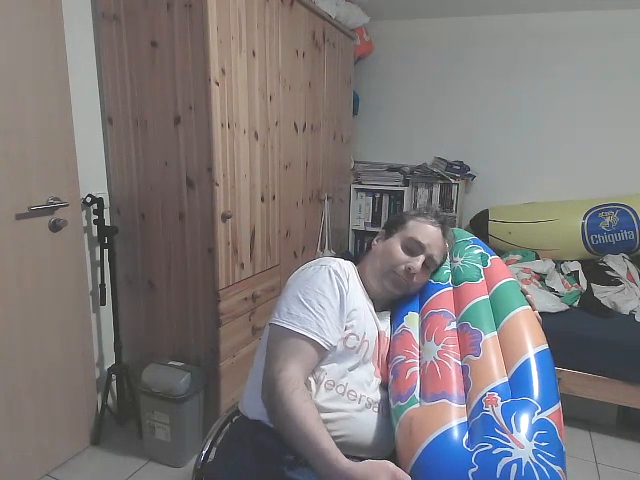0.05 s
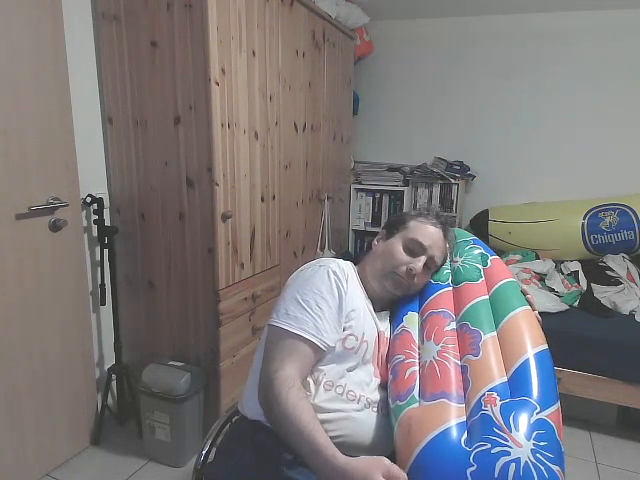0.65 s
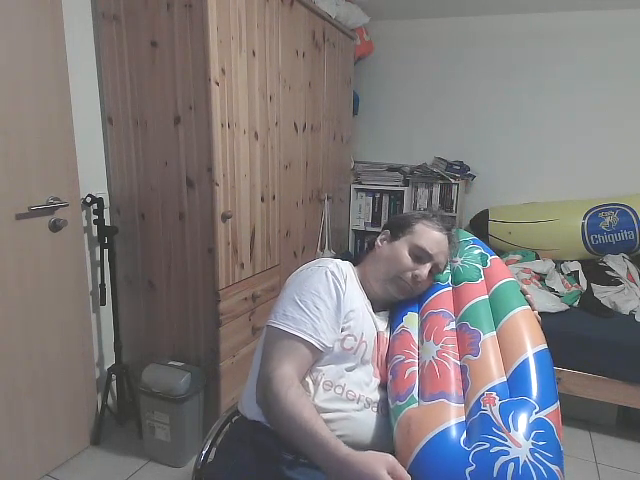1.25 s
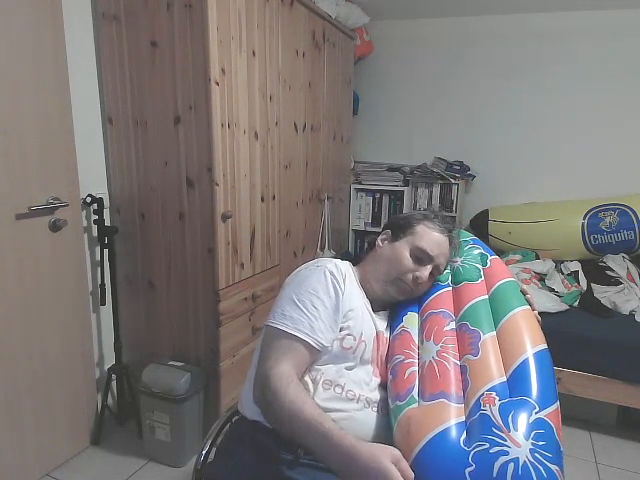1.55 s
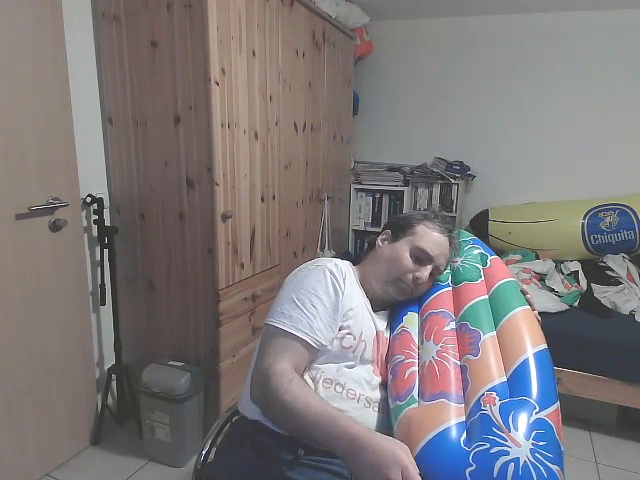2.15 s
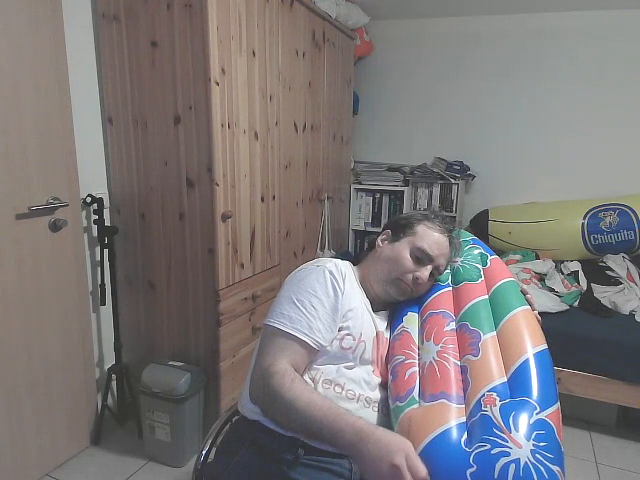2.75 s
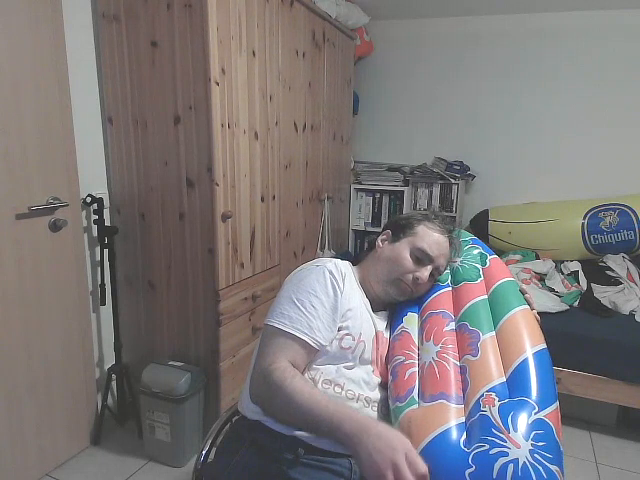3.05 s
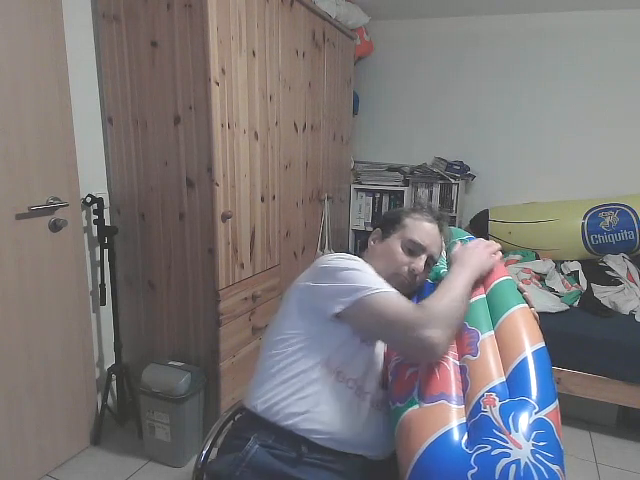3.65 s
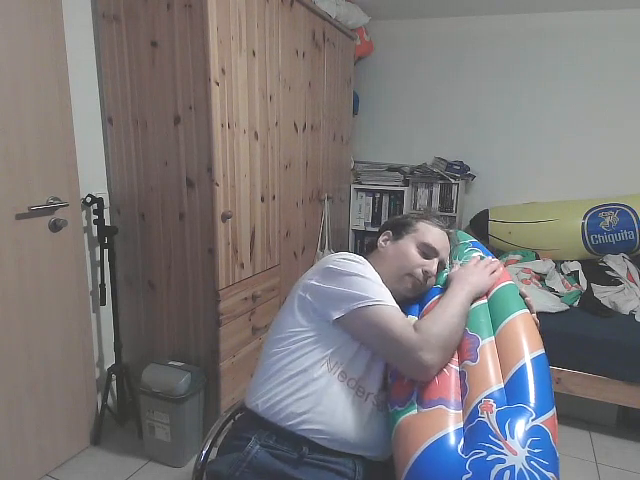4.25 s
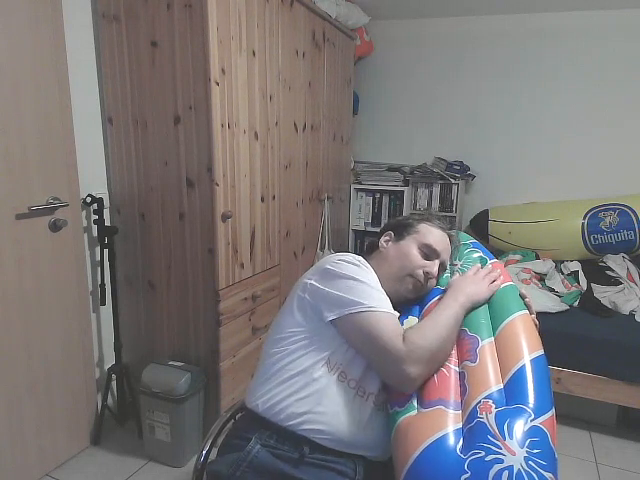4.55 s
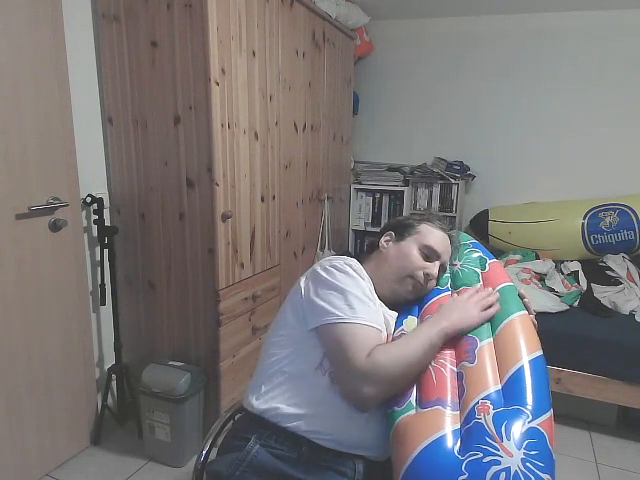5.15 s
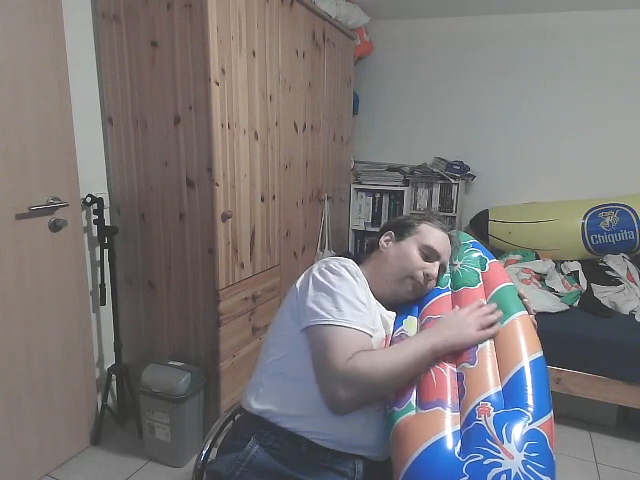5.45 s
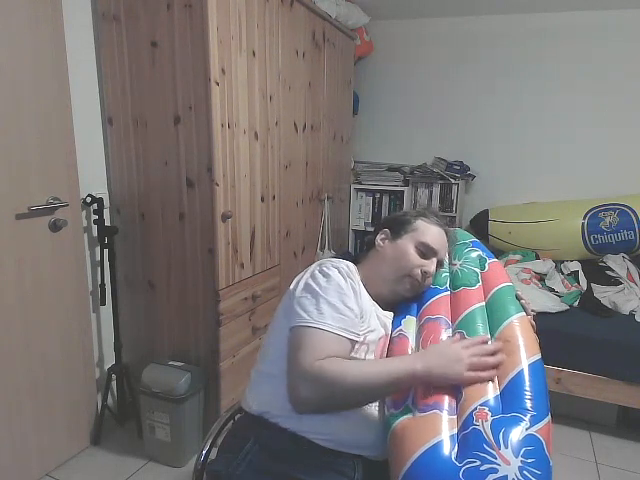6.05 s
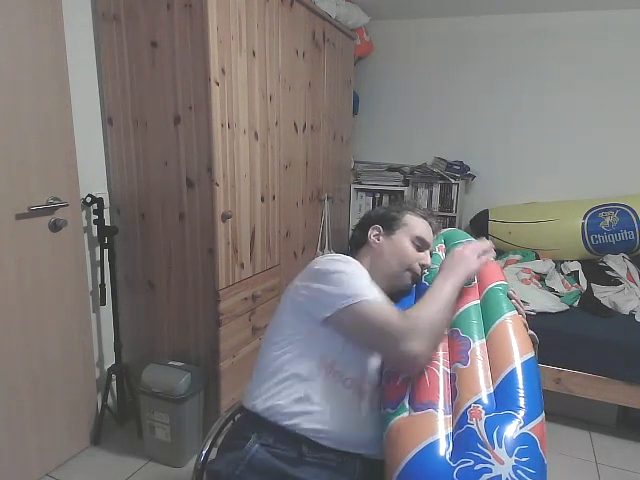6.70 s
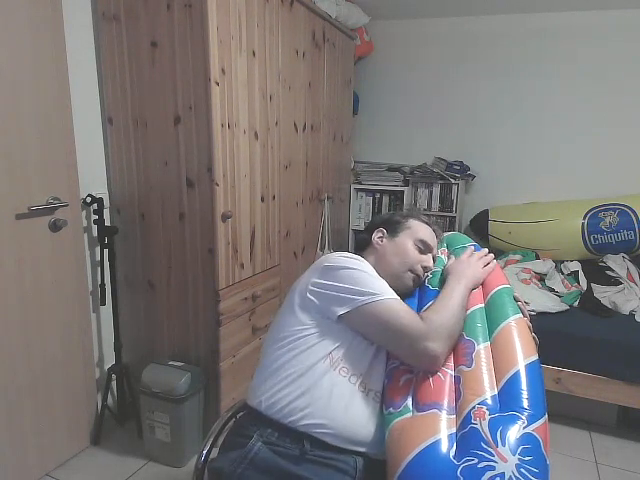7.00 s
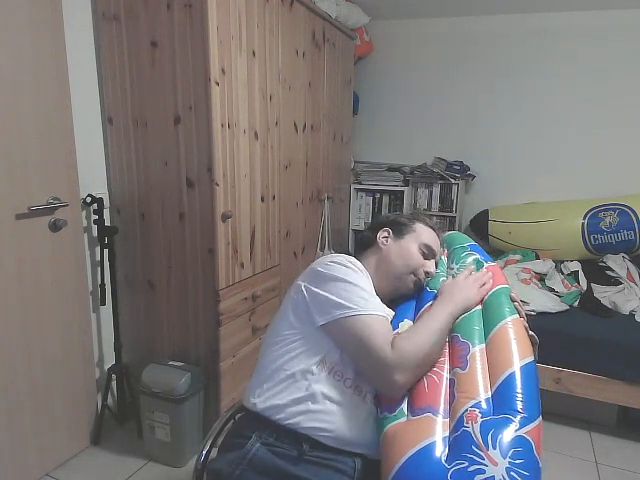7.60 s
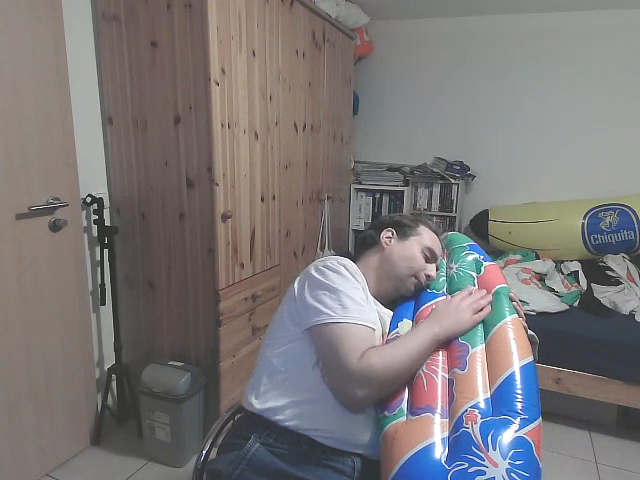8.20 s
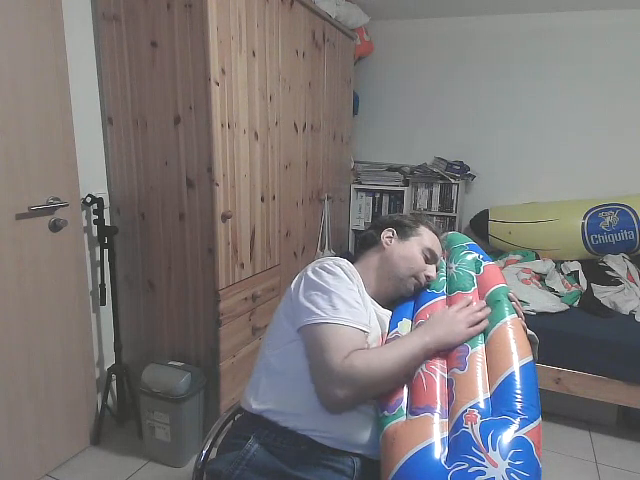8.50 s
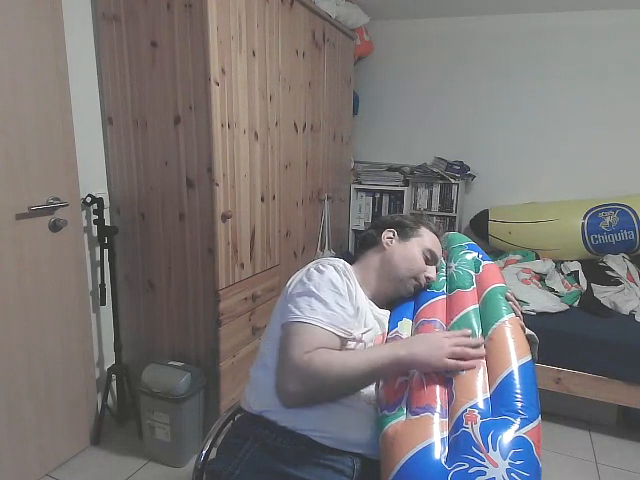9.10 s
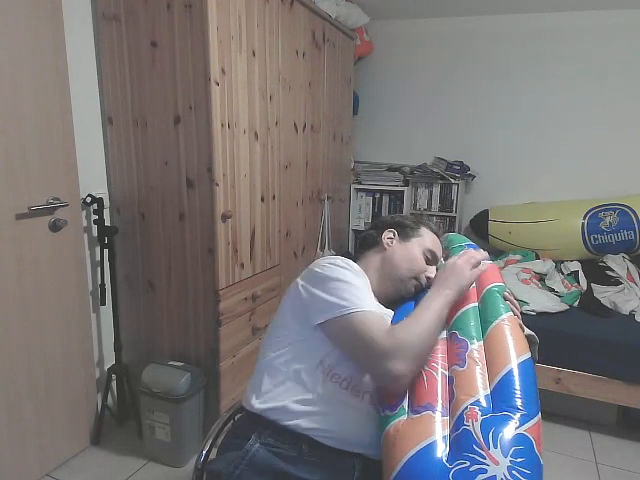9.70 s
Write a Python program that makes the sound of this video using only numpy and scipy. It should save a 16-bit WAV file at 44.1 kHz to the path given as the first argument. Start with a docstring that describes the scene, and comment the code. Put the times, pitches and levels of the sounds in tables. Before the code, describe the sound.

A low rumble, a thin whine and a faint knock are heard in a small quiet bedroom. Then the plug of an inflatable board pops with a thump, and air shrieks out with a brief rasp. The hiss softens, swells as the board is squeezed, and twice nearly stops before returning. Light knocks on the vinyl come in between, with a last low one near the end. One microphone picks it up with a short room echo.

```python
"""The valve of an inflatable board is pinched open in a small quiet bedroom, heard by one microphone.
First come a low rumble, a thin whine and a faint knock. Two seconds in, the plug pops and the board thumps.
The jet of air shrieks for an instant, the flap rasps, and the hiss softens as the pressure falls.
An arm squeezes out more air. Twice the flow nearly stops while the arm shifts its grip,
and returns with the next squeeze. Near the end, a last knock rocks the board."""
import sys
import numpy as np
from scipy import signal
from scipy.fft import rfft, irfft
from scipy.io import wavfile

SR = 44100
rng = np.random.default_rng(int(sys.argv[2]) if len(sys.argv) > 2 else 0)


def bounce(signal):
    """Save signal as a 16-bit WAV file at the path given by the first command-line argument."""
    frames = np.transpose(np.atleast_2d(signal))
    limited = np.clip(frames, -1, 1)
    pcm = np.round(limited * 32767).astype(np.int16)
    wavfile.write(sys.argv[1], SR, pcm)


N = 438354
T = np.arange(N) / SR
FREQS = np.fft.rfftfreq(N, 1 / SR)
OPEN_S = 2.104  # the air starts to escape


def undb(db):
    """Turn decibels into a gain."""
    return 10 ** (np.asarray(db) / 20)


def unit(x):
    """Scale a sound to an average (rms) level of 1."""
    return x / np.sqrt(np.mean(x ** 2))


def curve(table):
    """Join rows of (seconds, value) with straight lines."""
    return np.interp(T, *np.transpose(table))


def colour(points):
    """Gain at every frequency, from rows of (Hz, dB)."""
    hz, db = np.transpose(points)
    return undb(np.interp(np.log(FREQS + 1), np.log(hz), db))


def resonance(hz, width_hz):
    """Gain of one resonance: 1 at its centre, less on either side."""
    return 1j * FREQS * width_hz / (hz ** 2 - FREQS ** 2 + 1j * FREQS * width_hz)


def noise(response):
    """Noise of level 1, shaped by a gain for each frequency."""
    return unit(irfft(rfft(rng.standard_normal(N)) * response, N))


def flicker(db, rate):
    """A gain that wanders by about db decibels, about rate times a second."""
    return undb(db * noise(np.exp(-(FREQS / rate) ** 2)))


def since(start):
    """Seconds since the start, zero before it."""
    return np.maximum(T - start, 0)


def fade(t, t60):
    """A gain that falls 60 dB every t60 seconds."""
    return np.exp(-np.log(1000) * t / t60)


# Tone of the room and microphone noise. Each row: frequency in Hz, relative level in dB.
QUIET_COLOUR = [(10, -21.5), (20, 4.5), (30, -7), (39, -3.5), (52, -14.5), (110, -12.5), (145, -21),
                (200, -20), (285, -19), (400, -29), (550, -28.5), (950, -32), (2000, -36), (7000, -38.5),
                (11000, -37), (12500, -32), (15800, -34)]

def background(whine_hz=15045, ramps_per_s=20, tone_share=.55):
    """Low room rumble, microphone hiss and a thin electrical whine that swells in quick ramps."""
    tone = np.sqrt(2) * np.sin(2 * np.pi * whine_hz * T)
    ramp = (T * ramps_per_s + .26) % 1
    rough_tone = tone_share * tone + (1 - tone_share) * noise(resonance(whine_hz, 220))
    whine = unit((.2 + ramp) * rough_tone)
    fizz = unit(ramp ** 8 * noise(resonance(13600, 2600) ** 2))  # at the end of each ramp
    return undb(-61.5) * noise(colour(QUIET_COLOUR)) + undb(-77) * whine + undb(-79) * fizz


# Notes of the air inside the board. Each row: pitch in Hz, seconds to fade 60 dB, relative level in dB.
CHAMBER_NOTES = [(75, 0.18, 0.5), (110, .12, -2.5), (175, 0.031, 9.5), (259, 0.06, 6), (360, 0.21, -6),
                 (422, .08, -1.5)]
# Knocks on the board. Each row: start in seconds, then levels in dB of the ring, the rocking and the tick.
BOARD_KNOCKS = [(0.112, -69, -84, -63.5), (2.103, -44, -36, -52), (2.441, -57, -79, -62),
                (3.169, -64, -46, -75), (6.886, -68, -80, -55), (8.098, -62, -80, -58),
                (8.773, -62.5, -73, -71), (9.479, -61.5, -40.5, -60)]

def knocks(rock_hz=29, contact_s=0.0015):
    """The popping plug and the shifting arm ring the air chamber, rock the board and tick on its skin."""
    t = np.arange(SR // 2) / SR
    ring = sum(undb(db) * np.sin(2 * np.pi * hz * t) * fade(t, t60) for hz, t60, db in CHAMBER_NOTES)
    rock = np.sin(2 * np.pi * rock_hz * t) * fade(t, t60=0.254)
    skin = noise(resonance(520, 1000) ** 2)
    attack = np.minimum(t / contact_s, 1)  # soft vinyl: a knock takes a moment to build
    out = np.zeros(N + len(t))
    for start, ring_db, rock_db, tick_db in BOARD_KNOCKS:
        i = int(start * SR)
        tick = np.roll(skin, -i)[:len(t)] * fade(t, t60=0.07)
        knock = undb(ring_db) * ring + undb(rock_db) * rock + undb(tick_db) * tick
        out[i:i + len(t)] += knock * attack
    return out[:N]


def opening(rise_s):
    """The flap swings open: 0 when shut, 1 when open."""
    return np.clip(since(OPEN_S) / rise_s, 0, 1)


def choke(at_s=2.39, half_s=0.055, depth_db=-2):
    """A brief dip in the highest hiss as the flap falls back."""
    return undb(depth_db * np.exp(-((T - at_s) / half_s) ** 2))


def shriek(hold_s=0.011):
    """At full pressure the gap whistles and spits; a broad sizzle lingers."""
    whistle = undb(-15) * noise(resonance(9450, 1500) ** 2) * fade(since(OPEN_S + hold_s), t60=0.14)
    spit = undb(-36) * noise(resonance(7000, 2400) ** 2) * fade(since(OPEN_S), t60=1.0)
    sizzle = undb(-37) * noise(resonance(9500, 3400) ** 2) * fade(since(OPEN_S), t60=3.2)
    return (whistle + spit + sizzle) * choke() * opening(rise_s=0.017) ** 2


# The arm squeezes the board. Each row: start, swell time and hold time in seconds, flow level in dB.
ARM_SQUEEZES = [(2.494, 1.16, 1.93, -54), (6.033, .67, .18, -59.5), (6.418, 0.8, 0.38, -60.5),
                (6.997, 0.96, .6, -62.6), (9.165, 0.63, .3, -63.5)]

def outflow(leak_db=-91, blowoff_db_per_s=13.5, sag_db_per_s=5, release_db_per_s=62):
    """Airflow in dB: the board's own pressure blows off, then squeezes push out more, over a tiny leak."""
    blowoff = undb(-40.5 - blowoff_db_per_s * since(OPEN_S))
    power = blowoff ** 2 + undb(leak_db) ** 2
    for start, swell_s, hold_s, db in ARM_SQUEEZES:
        swell = np.minimum(since(start) / swell_s, 1) ** 1.12
        sag_db = sag_db_per_s * since(start + swell_s)  # the board gives way
        release_db = release_db_per_s * since(start + swell_s + hold_s)  # the arm lets go
        power += (swell * undb(db - sag_db - release_db)) ** 2
    return 10 * np.log10(power)


def with_swells(base_db, table):
    """Gain of a base level with bell-shaped swells added on top."""
    power = sum(undb(db) ** 2 * np.exp(-2 * ((T - s) / half_s) ** 2) for s, half_s, db in table)
    return np.sqrt(undb(base_db) ** 2 + power)


def blend(wide, narrow, slit):
    """Noise between two tones: a slit sheds finer swirls of air than a round opening."""
    return np.sqrt(1 - slit) * noise(colour(wide)) + np.sqrt(slit) * noise(colour(narrow))


# Tone of the hiss, round opening and slit. Each row: frequency in Hz, relative level in dB.
ROUND_HISS = [(3000, -36.5), (8000, -17.5), (10000, -9.5), (10900, -6), (11500, -2.5), (12400, 2),
              (13100, -3), (14000, -5.5), (15000, -15.5), (15800, -15.5)]
SLIT_HISS = [(3000, -25), (7500, -14), (9500, -10), (10900, -7), (11600, -5), (12600, -2.5), (13200, -0.5),
             (14100, -7.5), (15000, -7), (15800, -9.5)]
# Brief spurts and slower swells of the hiss. Each row: middle and half length in seconds, level in dB.
HISS_SWELLS = [(2.63, 0.22, -39.5), (3.15, 0.47, -48), (5.635, 0.11, -53), (5.812, .03, -58.5),
               (6.195, 0.081, -61.5), (8.25, 0.45, -57), (8.745, 0.037, -61.5), (9.19, 0.057, -62.5)]

def lip_hiss(extra_flow_db, slit, slit_boost_db=6):
    """Air tumbles over the lip of the valve and hisses, louder through a slit."""
    level = with_swells(-51 + 1.395 * extra_flow_db + slit_boost_db * slit, HISS_SWELLS)
    return flicker(db=0.6, rate=70) * level * choke() * blend(ROUND_HISS, SLIT_HISS, slit)


# Tone of the stream of air. Each row: frequency in Hz, relative level in dB.
PLUME_COLOUR = [(150, -15.5), (450, -13.5), (1200, -3), (2100, -2.5), (2700, 1.5), (3400, 4), (4300, 4.5),
                (4800, 4), (6000, 3.5), (7500, 1.5), (9500, -3), (12000, -12.5)]
# Resonances of the valve stem. Each row: centre in Hz, width in Hz, relative level in dB.
STEM_RESONANCES = [(2140, 75, -5), (2340, 30, -14), (3120, 66, -8.5), (3620, 45, -15.5), (4050, 60, -15.5),
                   (5420, 80, -10), (5830, 80, -13), (6930, 200, -26.5)]

def plume(flow_db):
    """The swirling stream of air rushes, coloured by the valve stem."""
    stem = 1 + sum(undb(db) * resonance(hz, width) for hz, width, db in STEM_RESONANCES)
    return undb(flow_db) * flicker(db=0.6, rate=30) * noise(colour(PLUME_COLOUR) * stem)


# Tone of the blowing, round opening and slit. Each row: frequency in Hz, relative level in dB.
ROUND_BLOWING = [(150, -11.5), (330, -12.5), (450, -1.5), (650, -2.5), (980, 2.5), (1400, -3.5),
                 (1800, -5.5), (2300, -8), (4000, -12), (9000, -38.5)]
SLIT_BLOWING = [(150, -14.5), (250, 4.5), (350, -3.5), (450, 2), (560, -1), (950, -1), (1400, -1),
                (1700, -3.5), (2200, -2.5), (4000, -16), (9000, -46.5)]
# The stream sweeps over a surface. Each row: middle and half length in seconds, level in dB.
SURFACE_SWEEPS = [(2.14, 0.17, -52), (2.45, .1, -53), (3.68, 0.37, -60.5), (4.28, 0.29, -56),
                  (4.62, 0.18, -60), (5.2, 0.66, -64), (6.7, 0.27, -63), (7.35, 0.85, -65),
                  (8.745, .025, -70), (9.48, 0.093, -71.5)]

def hollow_blowing(extra_flow_db, slit):
    """The air blows with a hollow sound where it strikes skin and vinyl."""
    level = with_swells(-64.5 + 0.39 * extra_flow_db, SURFACE_SWEEPS)
    return flicker(db=1.1, rate=25) * level * blend(ROUND_BLOWING, SLIT_BLOWING, slit)


# Loudness of the rasp. Each row: time in seconds, level in dB.
FLAP_LEVELS = [(2.11, -41), (2.26, -45), (2.33, -44), (2.385, -40), (2.445, -50), (2.49, -75), (2.7, -120)]
# Tone of the rasp. Each row: frequency in Hz, relative level in dB.
FLAP_COLOUR = [(500, -31), (1150, -13), (1550, -0.5), (2000, -4.5), (2500, -2.5), (3100, -6.5), (3800, -7),
               (4400, -5.5), (5000, -18.5), (8000, -32)]

def flap_rasp():
    """The half-open flap rasps just after the pop."""
    return undb(curve(FLAP_LEVELS)) * flicker(db=1.1, rate=90) * noise(colour(FLAP_COLOUR))


# How far the valve is pinched. Each row: time in seconds, shape from 0 (round) to 1 (slit).
VALVE_PINCH = [(2.1, 0.02), (3.6, 0.18), (4.2, 0), (5, 0.32), (5.6, 0.9), (6.4, 0.63), (7.3, 0.75),
               (8.3, 0.95), (9.9, 1)]

def jet(usual_flow_db=-57):
    """The four sounds of the escaping air; large swirls shake them slightly, all together."""
    flow_db = outflow()
    extra_flow_db = flow_db - usual_flow_db
    slit = curve(VALVE_PINCH)
    air = lip_hiss(extra_flow_db, slit) + plume(flow_db)
    air += hollow_blowing(extra_flow_db, slit) + flap_rasp()
    return air * opening(rise_s=0.0055) * flicker(db=0.05, rate=14)


def bedroom(x, echo_db=-3, positions=24):
    """Wardrobe, floor and walls return a short dense echo whose tone changes as the board sways."""
    t = np.arange(SR // 2) / SR
    envelope = fade(t, t60=.3) * np.minimum(t / 0.0035, 1)
    place = np.linspace(0, positions - 1, N)
    echo = np.zeros(N + len(t))
    for k in range(positions):  # each has its own random echo, which fades into the next
        tail = rng.standard_normal(len(t)) * envelope
        near = np.flatnonzero(abs(place - k) < 1)
        share = np.cos(np.pi / 2 * (place[near] - k))
        part = signal.fftconvolve(x[near] * share, tail / np.linalg.norm(tail))
        echo[near[0]:near[0] + len(part)] += part
    return (x + undb(echo_db) * echo[:N]) / np.hypot(1, undb(echo_db))


def scene():
    """One microphone feeds both channels."""
    mono = bedroom(jet() + shriek()) + knocks() + background()
    return np.array([mono, mono])


def record(dry, ceiling=0.66, top_hz=15800):
    """The recorder rounds the loudest peaks and steeply cuts the highest treble."""
    rounded = ceiling * np.tanh(dry / ceiling)
    return signal.sosfilt(signal.ellip(12, .1, 80, top_hz, fs=SR, output="sos"), rounded)


dry = scene()
out = record(dry)
bounce(out)
```